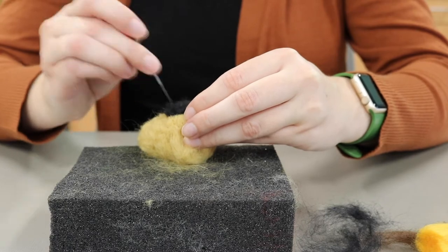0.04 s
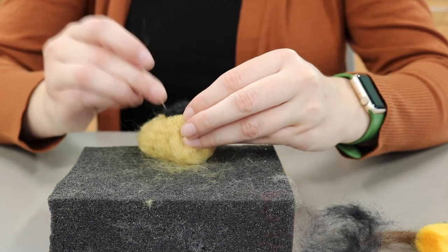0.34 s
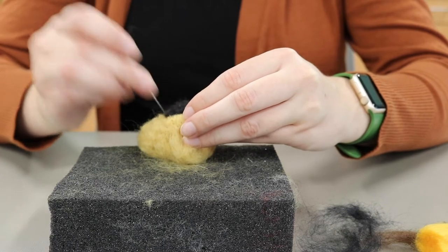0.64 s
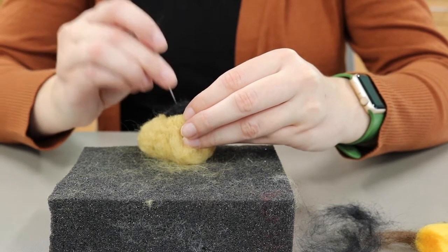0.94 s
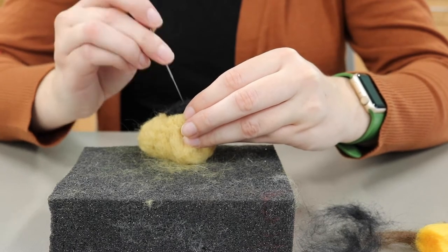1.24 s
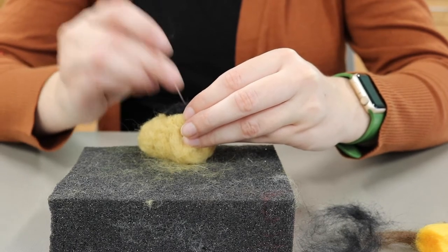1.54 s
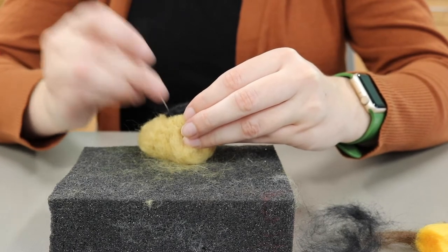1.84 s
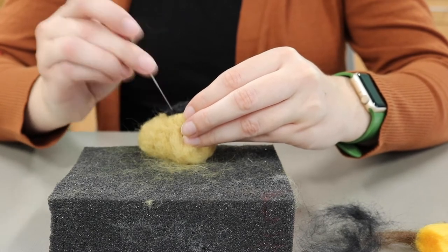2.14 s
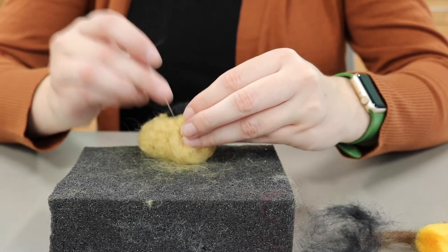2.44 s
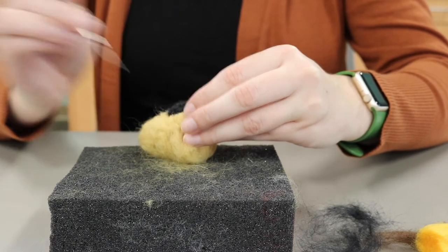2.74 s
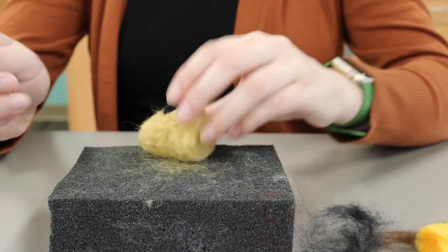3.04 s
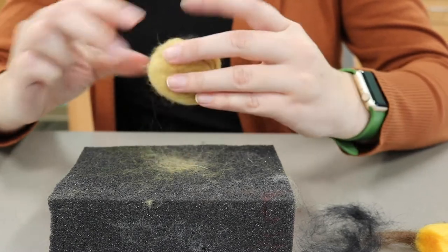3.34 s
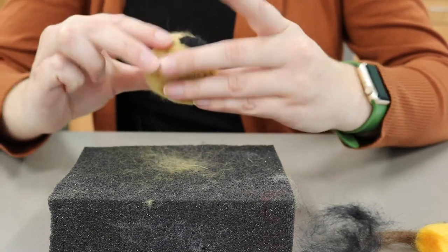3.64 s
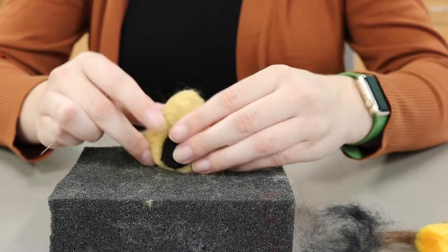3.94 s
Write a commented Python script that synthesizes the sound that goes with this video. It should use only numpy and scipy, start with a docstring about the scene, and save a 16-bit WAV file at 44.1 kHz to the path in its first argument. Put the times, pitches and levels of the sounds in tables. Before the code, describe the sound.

Quick, steady crunching of a barbed needle poking wool, with a low ventilation hum behind.

```python
"""A room's ventilation hums throughout. From the start a barbed felting needle stabs a ball of wool
on a foam block, five or six times a second. Each stab is a dull squash and a short crunch of fibre
slips, with a sharper snap where a barb catches. Hands and sleeves brush at 1.5 s and twice later.
From 2.8 s the wool is lifted and turned with a soft crackle; a few small ticks follow near 3.9 s."""
import sys
import numpy as np
from scipy import signal
from scipy.fft import rfft, irfft
from scipy.io import wavfile

SR = 44100
rng = np.random.default_rng(int(sys.argv[2]) if len(sys.argv) > 2 else 0)


def persist_wave(psi):
    """Save psi, clipped to +-1, as 16-bit WAV."""
    counts = np.round(np.clip(psi, -1, 1) * 32767).astype(np.int16)
    wavfile.write(sys.argv[1], SR, np.atleast_2d(counts).T)


N = 176400
T = np.arange(N) / SR
BIN_HZ = np.fft.rfftfreq(N, 1 / SR)


def amp(db):
    """Decibels to gain."""
    return 10 ** (np.asarray(db) / 20)


def unit(x):
    """Scales to rms 1."""
    return x / np.sqrt(np.mean(x ** 2) + 1e-20)


def read(points, hz):
    """Interpolates a table on a log-frequency axis."""
    f, value = np.transpose(points)
    return np.interp(np.log(hz + 1), np.log(f + 1), value)


def wander(rate_hz):
    """Smooth random motion, rms 1."""
    return unit(irfft(rfft(rng.standard_normal(N)) * np.exp(-(BIN_HZ / rate_hz) ** 2), N))


def noise(spectrum):
    """Shaped noise, rms 1."""
    return unit(irfft(rfft(rng.standard_normal(N)) * amp(read(spectrum, BIN_HZ)), N))


def swell(middle_s, half_s, shape=2):
    """Bell-shaped envelope, peak 1."""
    return np.exp(-.5 * abs((T - middle_s) / half_s) ** shape)


def ring(x, gain, size=4096):
    """Minimum-phase filter of energy 1, shaped like gain(Hz)."""
    log_gain = np.log(gain(abs(np.fft.fftfreq(size, 1 / SR))) + 1e-5)
    response = np.fft.ifft(np.exp(np.conj(signal.hilbert(log_gain)))).real[:size // 2]
    return signal.oaconvolve(x, response / np.linalg.norm(response))[:len(x)]


def add(mix, start_s, sound):
    """Adds a sound to the mix in place."""
    part = mix[max(round(start_s * SR), 0):][:len(sound)]
    part += sound[:len(part)]


# Room air. Each row: frequency in Hz, relative density in dB.
AIR_SPECTRUM = [(10, -58), (22, -14), (40, -6.5), (58, -7), (75, -3), (100, -9.5), (133, 0), (160, -3),
                (190, -3.5), (265, -11.5), (315, -9.5), (410, -10), (490, -15.5), (660, -19), (850, -23),
                (1300, -25), (2000, -30), (3300, -32), (5000, -38), (7000, -33.5), (9500, -34),
                (12000, -37.5), (15800, -44.5)]
# Likeness of the air in both channels. Each row: frequency in Hz, left-right correlation.
AIR_CORRELATION = [(30, 0.91), (140, 0.98), (300, 0.85), (600, 0.72), (1200, 0.13), (2500, 0.12),
                   (8000, 0.083), (15000, 0.18)]
# Ventilation tones. Each row: frequency in Hz, level in dB.
VENT_TONES = [(59.3, -56.5), (188.5, -58.5), (314, -65.5), (657, -70)]

def room_hum(air_db=-45.5, waver=.3, drift_rad=1.0, left_db=-.4, right_db=.25):
    """Ventilation rumble and hiss, nearly mono in the bass, with a few wavering tones."""
    left, other = noise(AIR_SPECTRUM), noise(AIR_SPECTRUM)
    same = read(AIR_CORRELATION, BIN_HZ)
    right = irfft(same * rfft(left) + np.sqrt(1 - same ** 2) * rfft(other), N)
    tones = np.zeros(N)
    for hz, db in VENT_TONES:
        level = 1 + waver * wander(4.5)
        phase = 2 * np.pi * hz * T + drift_rad * wander(1.43)
        tones += amp(db) * unit(level * np.sin(phase))
    return (amp(air_db) * np.array([left, right]) + tones) * amp([[left_db], [right_db]])


def fibre_slips(per_s, spread_db):
    """Fibres slip at random, each an impulse of random sign and size."""
    impulses = (rng.random(N) < per_s / SR) * rng.choice([-1, 1], N)
    return impulses * amp(spread_db * np.minimum(rng.exponential(1, N), 4))


def recolour(x, spread_db=2.5, step_hz=350, count=256):
    """Each stab meets other fibres: random bumps and dips along frequency."""
    bumps_db = spread_db * rng.standard_normal(count)
    return ring(x, lambda f: amp(np.interp(f, np.arange(count) * step_hz, bumps_db)))


def barb_snap(decay_s=.0009, size=400):
    """A barb lets go: one click and a crumble of smaller slips, equal in energy."""
    crumble = rng.standard_normal(size) * np.exp(-T[:size] / decay_s)
    burst = crumble / np.linalg.norm(crumble) - signal.unit_impulse(size)
    return burst / np.linalg.norm(burst)


# Stabs. Each row: middle in s, half length in s, level in dB, body offset in dB, squash level in dB.
NEEDLE_STABS = [(.001, 0.0072, -47.5, 3, -66), (0.171, 0.02, -53.5, -4, -54), (.352, 0.017, -50, 1, -51),
                (0.536, 0.018, -51, 0, -50.5), (.727, 0.018, -50.5, 1.5, -55),
                (0.995, .025, -55.5, 1.5, -62), (1.187, 0.019, -54.5, 2, -70),
                (1.361, 0.021, -53.5, 1.5, -60), (1.544, 0.013, -49, -0.5, -52),
                (1.724, 0.014, -46, 0, -50), (1.913, 0.017, -47.5, 2, -67), (2.099, 0.016, -49, -0.5, -54),
                (2.276, 0.013, -51, 2, -52), (2.457, .018, -56, 5.5, -57), (2.642, 0.015, -50.5, 3, -56)]
# Barbs catching. Each row: start in s, level in dB, body offset in dB.
BARB_SNAPS = [(.005, -32, -5), (0.1674, -29, 6), (0.176, -24, -6), (0.1815, -20, 1.5), (0.342, -30, 3),
              (.3514, -27, 7), (.540, -37, 12), (.555, -25, -8), (0.7326, -24.5, 5.5), (.735, -26, -7),
              (0.7517, -29, 1), (1.185, -27, 4), (1.3442, -35, 7), (1.3744, -16, 0), (1.378, -25, 5.5),
              (1.5528, -22, 1), (1.7015, -26, -6), (1.924, -29, -8), (2.091, -41, -5), (2.2695, -31, -6),
              (2.2735, -18.5, -0.5), (2.281, -31, 2), (2.4691, -32, 11), (2.629, -22.5, -6),
              (2.6417, -25.5, 5.5)]
# Fizz of slipping fibres. Each row: frequency in Hz, relative gain in dB.
FIZZ_SPECTRUM = [(100, -45), (1500, -12.5), (4000, 5.5), (4800, -2.5), (5600, 0.5), (7000, 1), (9300, -1),
                 (12000, -5.5), (15800, -11)]
# Resonances of needle and block. Each row: frequency in Hz, width in Hz, relative gain in dB.
BODY_MODES = [(725, 204, 2.5), (1310, 143, -1), (1780, 160, -6.5), (2230, 170, -2), (2980, 280, -2.5),
              (3320, 320, 3.5), (3760, 150, 3)]
# Dull squash on entry. Each row: frequency in Hz, relative gain in dB.
SQUASH_SPECTRUM = [(150, 0), (500, 12), (1400, 1), (2300, -3.5), (4500, -7), (15000, -35)]

def needle_and_block(f):
    """Gain of the body resonances at f Hz, summed in power."""
    return np.sqrt(sum(amp(db) ** 2 / (1 + ((f * f - hz * hz) / (width_hz * f + 1)) ** 2)
                       for hz, width_hz, db in BODY_MODES))


def stabs(clump_db=2.5, clump_hz=260, body_db=-1, pull_db=-18.5, pull_after_s=.082, snap_fizz_db=-4.5):
    """Wool squashes, clumped slips and snaps fizz and ring the body, the needle slides faintly out."""
    slips = fibre_slips(per_s=8000, spread_db=3)
    slips = unit(slips * amp(clump_db * wander(clump_hz)))
    fizz, body, squash = np.zeros((3, N))
    for middle_s, half_s, db, offset_db, squash_db in NEEDLE_STABS:
        fibres = amp(db) * recolour(slips)
        thrust = fibres * swell(middle_s, half_s, shape=2.3)
        pull = fibres * amp(pull_db) * swell(middle_s + pull_after_s, half_s=.02)
        fizz += thrust
        body += thrust * amp(body_db + offset_db) + pull
        entry_s = middle_s - 1.35 * half_s
        squash += amp(squash_db) * swell(entry_s, half_s / 2)
    for start_s, db, offset_db in BARB_SNAPS:
        burst = amp(db) * barb_snap()
        add(fizz, start_s, burst * amp(snap_fizz_db))
        add(body, start_s, burst * amp(body_db + offset_db))
    crunch = ring(fizz, lambda f: amp(read(FIZZ_SPECTRUM, f))) + ring(body, needle_and_block)
    return crunch + squash * noise(SQUASH_SPECTRUM)


# Hands and sleeves brushing. Each row: middle in s, half length in s, level in dB.
HAND_BRUSHES = [(1.466, 0.016, -57), (2.825, 0.036, -58), (3.22, 0.036, -56.5)]
# Rubbing noise. Each row: frequency in Hz, relative gain in dB.
BRUSH_SPECTRUM = [(200, -20), (600, 5), (1300, 0.5), (2200, -7.5), (3500, -7), (5000, -17), (9000, -13),
                  (15000, -27)]

def brushes(rough_db=3, rough_hz=80):
    """Soft uneven rubbing of skin and cloth."""
    level = sum(amp(db) * swell(middle_s, half_s) for middle_s, half_s, db in HAND_BRUSHES)
    return noise(BRUSH_SPECTRUM) * level * amp(rough_db * wander(rough_hz))


# Fingers squeezing the wool. Each row: middle in s, half length in s, level in dB.
WOOL_SQUEEZES = [(2.846, 0.016, -62.5), (3.143, .05, -69), (3.45, .08, -68), (3.88, 0.057, -59)]
# Wool crackle. Each row: frequency in Hz, relative gain in dB.
WOOL_SPECTRUM = [(300, -23), (2000, -7), (3600, 2.5), (5000, -9), (9000, -5), (15000, -13)]

def wool():
    """Faint dry crackle of fibres as the ball is lifted and turned."""
    crackle = unit(fibre_slips(per_s=1500, spread_db=4))
    level = sum(amp(db) * swell(middle_s, half_s) for middle_s, half_s, db in WOOL_SQUEEZES)
    return ring(crackle * level, lambda f: amp(read(WOOL_SPECTRUM, f)))


# Handling ticks. Each row: start in s, level in dB, low edge in Hz, high edge in Hz.
HANDLING_TICKS = [(3.8688, -30, 9000, 17000), (3.903, -23, 4000, 10000), (3.9074, -28, 5500, 11000),
                  (3.908, -22, 10500, 11500), (3.9095, -29, 4400, 5100), (3.914, -31, 4300, 4960)]

def ticks(order=13):
    """Tiny bright clicks, each in its own band, as the wool is turned with the needle in hand."""
    out = np.zeros(N)
    for start_s, db, low_hz, high_hz in HANDLING_TICKS:
        band = lambda f: 1 / ((1 + (low_hz / (f + 1)) ** order) * (1 + (f / high_hz) ** (2 * order)))
        add(out, start_s, ring(-amp(db) * signal.unit_impulse(512), band))
    return out


def space(x, near_db=-10, near_decay_s=.0038, room_db=-11.5, room_t60_s=1, left_lag_s=1e-5):
    """Direct sound slightly from the right, widened by table and hand reflections, with a room tail."""
    t = T[:SR // 2]
    near = rfft(rng.standard_normal(len(t)) * np.exp(-t / near_decay_s) * (t > .0004), N)
    width = amp(near_db) * irfft(rfft(x) * near / (abs(near) + 1e-9), N)
    lagged = irfft(rfft(x) * np.exp(-2j * np.pi * BIN_HZ * left_lag_s), N)
    far = rng.standard_normal((2, len(t))) * np.exp(-np.log(1000) * t / room_t60_s) * (t > .006)
    tail = amp(room_db) * signal.fftconvolve(x[None], far / np.linalg.norm(far[0]), axes=1)[:, :N]
    return (np.array([lagged + width, x - width]) + tail) * amp([[-4], [-1.08]])  # left, right


def scene():
    """Handwork at the table over the hum of the room."""
    return room_hum() + space(stabs() + brushes() + wool() + ticks())


def record(dry):
    """Steep low-pass at 15850 Hz."""
    lowpass = signal.firwin(511, 15850, window=("kaiser", 9), fs=SR)
    return signal.oaconvolve(dry, lowpass[None], "same")


dry = scene()
out = record(dry)
persist_wave(out)
```